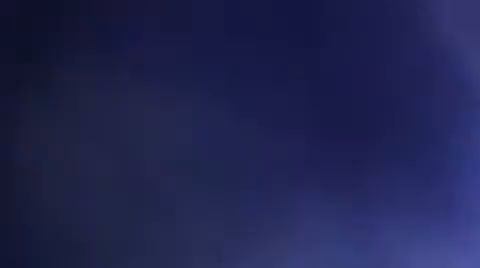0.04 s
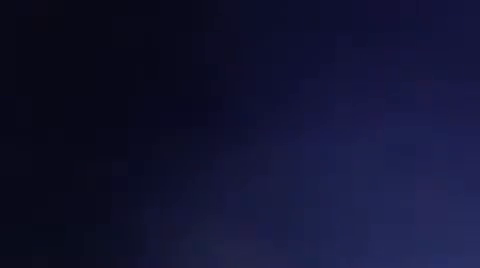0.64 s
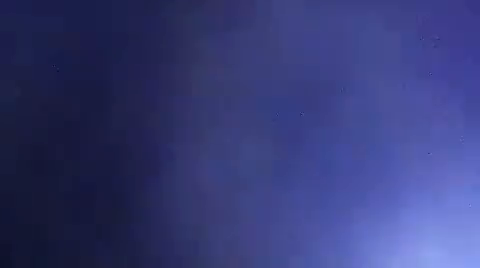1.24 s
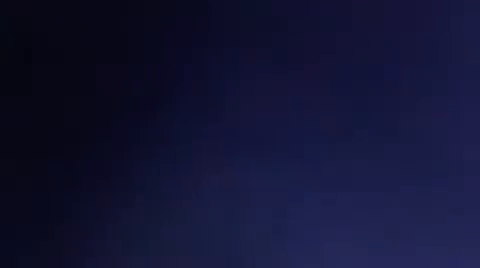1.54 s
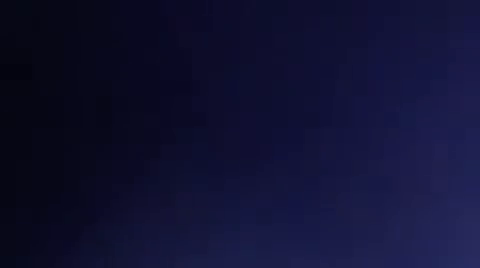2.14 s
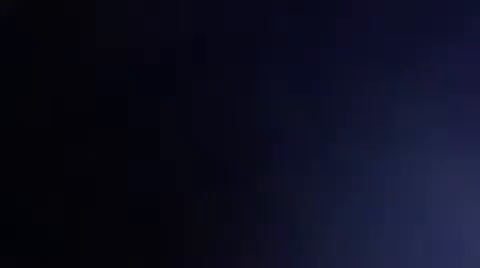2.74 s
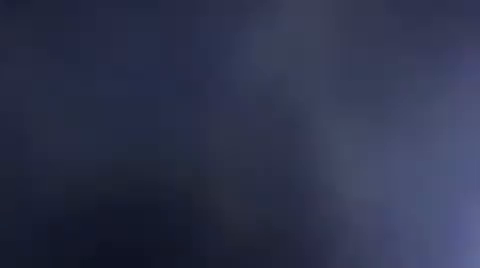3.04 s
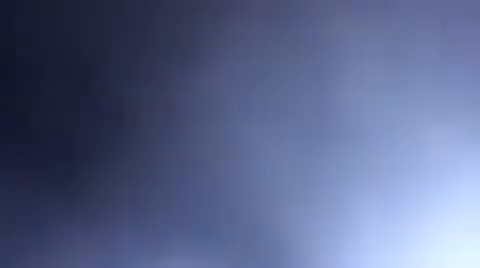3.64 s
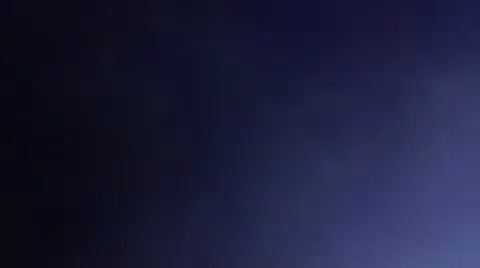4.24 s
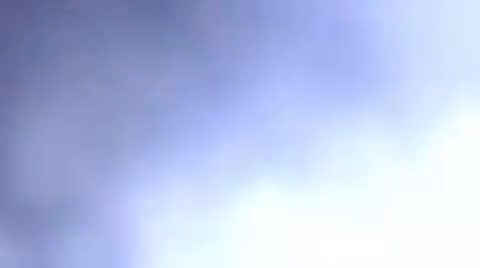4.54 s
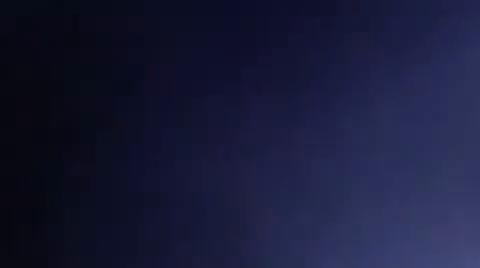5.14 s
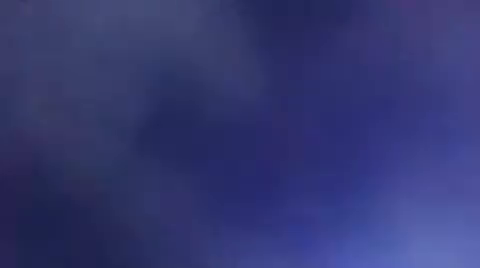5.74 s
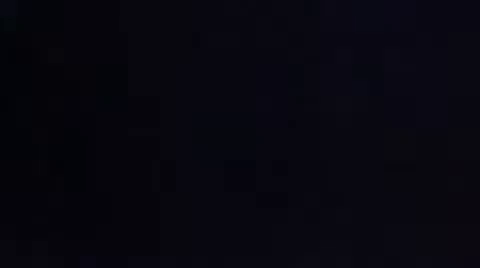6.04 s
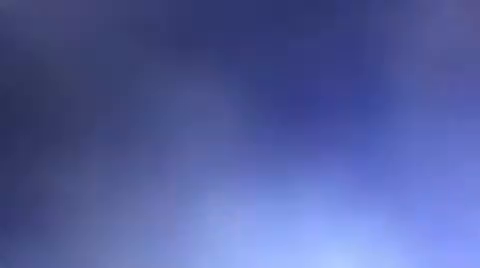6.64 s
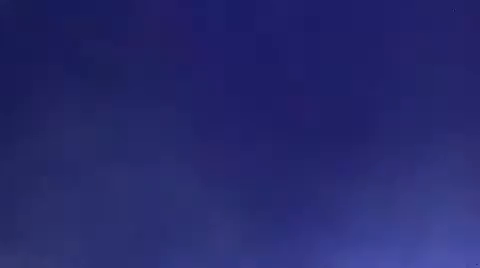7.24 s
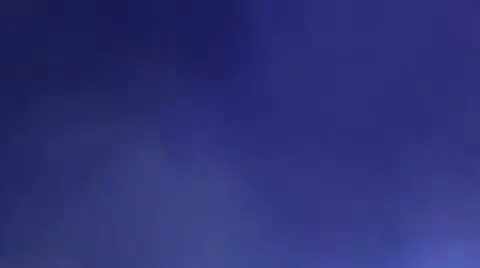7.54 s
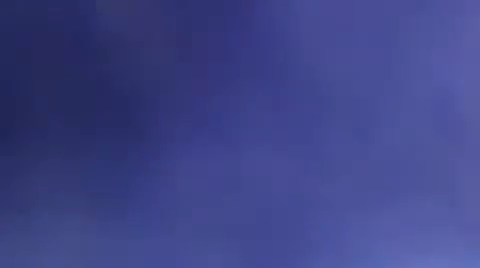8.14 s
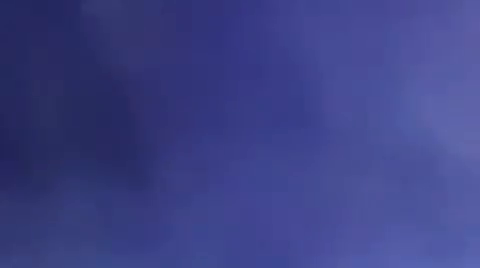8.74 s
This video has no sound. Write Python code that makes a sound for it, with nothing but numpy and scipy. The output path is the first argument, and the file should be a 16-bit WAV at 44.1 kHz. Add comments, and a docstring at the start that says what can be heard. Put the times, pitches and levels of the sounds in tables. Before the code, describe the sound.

Close, muffled fabric rustles and rumbles against a pocketed microphone, broken by dull bumps and short scuffs.

```python
"""Soft cloth slides in uneven strokes over the port of a microphone carried in a pocket.
Stick-slip friction makes the weave rasp, loose fibres hiss and the pressed cloth rumble on the case.
Now and then the case bumps the body and trapped air rings with a dull thump. There are short ticks
and scuffs of cloth, one squeak, and one sharp crack as the hardest thump overloads the microphone.
Far sounds come faintly through the fabric."""
import sys
import numpy as np
from scipy import signal
from scipy.fft import rfft, irfft, next_fast_len
from scipy.io import wavfile

SR = 44100
rng = np.random.default_rng(int(sys.argv[2]) if len(sys.argv) > 2 else 0)


def bounce(signal):
    """Save signal as a 16-bit WAV file at the path given by the first command-line argument."""
    frames = np.transpose(np.atleast_2d(signal))
    limited = np.clip(frames, -1, 1)
    pcm = np.round(limited * 32767).astype(np.int16)
    wavfile.write(sys.argv[1], SR, pcm)


N = 396459

# Strokes of the cloth. Each row: peak time, rise and fall in seconds, rasp level in dB,
# then rumble and hiss in dB over the rasp. The levels stand before each layer's trim.
RUBS = [(.02,0.041,0.042,-46.5,13,-5.5),(.105,0.037,.05,-41.5,13,-8.5),(.185,0.029,0.033,-46,14.5,-7),(.32,0.14,0.082,-51,8,-4),(.45,0.055,0.04,-51,16,-2),(.55,0.076,.04,-50.5,12,-2.5),(.66,0.019,0.037,-54.5,7,-9),
        (1.016,0.041,0.052,-38.5,9,-7.5),(1.13,0.03,0.034,-45.5,8,-7.5),(1.29,0.093,.06,-49,6.5,-3),(1.39,.05,0.035,-45.5,9.5,-5.5),(1.51,.025,0.049,-60,-6,3.5),(1.555,0.0096,0.092,-50,10.5,-5),
        (1.694,0.032,0.08,-32.5,8.5,-11),(1.77,0.024,.03,-46,18.5,-18),(1.89,0.072,.07,-49,13,-6),(2.01,0.13,0.045,-43,11.5,-8.5),(2.287,0.018,0.025,-30.5,9,-12),(2.384,0.052,0.05,-34.5,10,-12.5),
        (2.575,0.023,0.056,-46,12.5,-16),(2.634,0.053,0.05,-42.5,7,-4.5),(2.82,0.084,0.1,-62,-13,5),(2.877,0.0076,0.03,-33.5,9.5,-9),(2.979,0.031,0.039,-32,10,-12.5),(3.25,0.097,0.053,-46,10.5,-8),
        (3.32,0.043,0.05,-57,-7,5.5),(3.55,0.066,0.064,-43,-11,-4),(3.629,0.063,0.023,-38,9.5,-10.5),(3.719,0.024,0.046,-46,12.5,-14),(3.85,0.092,0.083,-53,18.5,-36),(3.955,0.082,0.063,-44.5,9,-6),(4.005,0.035,0.019,-33,8.5,-10),(4.074,0.063,0.052,-40,9,-8.5),(4.15,0.035,0.036,-42,6.5,-18),
        (4.285,0.036,0.025,-48.5,8.5,-8),(4.32,0.022,0.026,-47,-8,-4.5),(4.38,0.033,0.14,-45.5,10.5,-8),(4.486,0.027,0.032,-31,3.5,-12.5),(4.73,0.16,0.27,-49.5,11,-10.5),(4.879,.01,0.029,-37,14,-8),(4.93,.02,0.033,-42.5,6.5,-8),(5.005,0.045,0.026,-41.5,4,-10.5),
        (5.148,0.06,0.056,-44,12.5,-12),(5.29,0.066,0.12,-48.5,17.5,-4.5),(5.371,0.024,0.04,-24.5,10,-12),(5.594,0.028,0.056,-47,14.5,-10.5),(5.836,0.074,0.048,-41,12,-9),
        (6.01,0.09,0.12,-44.5,7,-8.5),(6.11,0.061,0.027,-49.5,18,-11),(6.235,0.061,0.049,-46.5,18,-6),(6.296,.016,0.021,-19,7.5,-14.5),(6.351,0.033,.035,-43,9,-2),(6.519,0.019,0.031,-45,15,-13),
        (6.682,0.07,0.029,-42,12.5,-10),(6.745,0.021,.025,-39,10,-15),(6.825,0.057,0.036,-39,13,-7),(6.99,0.094,0.086,-44.5,8.5,-9.5),(7.16,.04,0.027,-55.5,8,-6),(7.241,0.023,0.027,-31.5,7.5,-12),(7.41,0.093,0.059,-43.5,11,-14.5),
        (7.525,0.021,0.038,-39.5,7,-13.5),(7.6,.02,0.028,-50,-2,-26),(7.7,0.09,0.18,-53,11,-14),(8.072,0.02,0.062,-39.5,9,-11),(8.136,.02,0.028,-43.5,14,-14),(8.189,0.039,0.052,-37,7,-13.5),(8.31,0.048,0.09,-45.5,14.5,-10.5),(8.446,0.03,0.032,-42.5,6,-10.5),(8.565,0.047,0.11,-47,10.5,-11.5),(8.679,0.035,0.059,-52.5,11.5,-12),(8.97,0.076,0.087,-48.5,3,-8)]


def cloth(stall_db=-53.5, full_grind_db=-26, catch_limit_db=-34):
    """Stick-slip friction: one sliding contact drives rumble, rasp and hiss, so they judder together."""
    # Spectra of the three layers. Each row: frequency in Hz, relative spectral level in dB.
    rumble_spectrum = [(20, -43), (45, -27), (80, -11.5), (125, -2), (190, 3.5), (250, 0), (310, -1.5),
                       (375, -6), (450, -10), (620, -11.5), (850, -19), (1500, -75)]
    rasp_spectrum = [(100, -23), (300, 0.5), (530, 0.5), (700, 1), (860, -4.5), (1150, -2.5), (1700, -4.5),
                     (2600, -8.5), (3800, -13.5), (5500, -21.5), (10000, -59.5)]
    hiss_spectrum = [(1500, -6.5), (3000, 3), (4500, 3), (5500, 1.5), (6500, 0.5), (8000, -3.5), (9400, -8),
                     (10300, -30.5)]
    # Slow creep between the strokes. Each row: time in seconds, rasp level in dB.
    creep = [(0,-51.5),(.7,-52.5),(.83,-59),(.93,-50.5),(1.5,-51.5),(2.15,-52),(2.23,-52.5),(2.45,-47),(4.1,-55.5),(4.22,-58),(4.4,-58),(5.5,-51),(5.7,-55.5),(7.15,-57.5),(7.72,-54.5),(7.87,-65),(8.0,-51.5),(8.5,-60),(8.8,-57)]
    rasp_db, rumble_db, hiss_db = np.transpose(RUBS)[3:]
    judder = flutter(per_s=92)
    grip = slips(per_s=5000, spread_db=3.5)
    weave = slips(per_s=9000, spread_db=-2.5)
    fibres = slips(per_s=22000, spread_db=0.5)
    creep_db = np.interp(np.arange(N) / SR, *np.transpose(creep)) - 1.6 * flutter(per_s=18)
    effort = rubbing(rasp_db + 2.5, creep_db)
    rumble_gain = rubbing(rasp_db + rumble_db + 2.9, creep_db + 2.5)
    hiss_gain = rubbing(rasp_db + hiss_db + 3.23, creep_db - 8.5, exponent=0.91)
    rumble = folds(coloured(grip, rumble_spectrum)) * rumble_gain * from_db(0.53 * judder)
    rasp = coloured(weave, rasp_spectrum) * effort * from_db(0.4 * judder)
    # As the cloth stalls, the fibres stop slipping: the rasp dulls and the hiss dies.
    slipping = 1 / (1 + (from_db(stall_db) / effort) ** 4)
    dull_rasp = signal.sosfilt(signal.butter(1, 2800, fs=SR, output="sos"), rasp)
    rasp = slipping * rasp + (1 - slipping) * dull_rasp
    hiss = coloured(fibres, hiss_spectrum) * hiss_gain * slipping * from_db(0.6 * judder)
    # Pressed hard, the weave grinds with a fuller middle.
    pressed = np.minimum(effort / from_db(full_grind_db), 1)
    grind = from_db(-3) * pressed * resonance(rasp, hz=800, width_hz=1100)
    # A thread holds only so much force, which limits the level of its tick.
    ticks = np.minimum(effort, from_db(catch_limit_db)) * catches()
    return rumble + rasp + grind + hiss + ticks


def slips(per_s, spread_db):
    """Shot noise: threads catch and let go at random, in a dense train of tiny uneven impulses."""
    released = rng.random(N) < per_s / SR
    return released * rng.standard_normal(N) * from_db(spread_db * flutter(per_s=3000))


def rubbing(levels_db, creep_db, exponent=1):
    """Incoherent sources add in power: the strokes and the creep give the gain of one layer."""
    power = sum(from_db(db) ** 2 * swell(*rub[:3]) ** exponent for rub, db in zip(RUBS, levels_db))
    power = np.interp(np.linspace(0, 1, N), np.linspace(0, 1, len(power)), power)
    return np.sqrt(power + from_db(creep_db) ** 2)


def swell(peak_s, rise_s, fall_s, settle_db=-22.5, settle_s=0.081):
    """Friction power follows sliding speed: one stroke gathers pace, peaks, slows and settles."""
    t = np.arange(0, N, 32) / SR - peak_s
    span_s = np.where(t < 0, rise_s, fall_s)
    shape = np.where(t < 0, 1.35, 1.11)   # 1 is pointed, 2 is a bell
    slide = np.exp(-2 * np.abs(t / span_s) ** shape)
    settling = (t > 0) * from_db(settle_db) ** 2 * np.exp(-2 * np.abs(t) / settle_s)
    return slide + settling


def folds(x, shifting_db=7.0):
    """Cavity resonance: as folds open and close, now one hollow booms and now another; rms 1."""
    # Air trapped in the folds. Each row: frequency in Hz, bandwidth in Hz, median gain in dB.
    cavities = [(162.6, 19, -8.5), (226.7, 28.5, -1), (275.6, 66, -11), (377, 180, 2.5)]
    booms = [from_db(db + shifting_db * flutter(per_s=12)) * resonance(x, hz, width_hz)
             for hz, width_hz, db in cavities]
    return rms_one(x + sum(booms))


def catches(per_s=12, hz=900, width_hz=1200, over_rasp_db=9):
    """Impulse response: single threads let go at random, each with a small, heavily damped tick."""
    clicks = (rng.random(N) < per_s / SR) * rng.uniform(.3, 1, N)
    ticks = resonance(resonance(clicks, hz, width_hz), hz, 2 * width_hz)
    return from_db(over_rasp_db) * ticks / (np.abs(ticks).max() + 1e-12)


def thumps(contact_cycles=0.14, leak_hz=170, cloth_ratio=0.64, q=0.93, lead_s=0.0015):
    """Damped oscillation: a padded push compresses the air at the port, which swings for a few cycles."""
    # Bumps of the case against the body. Each row: time in seconds, peak level in dB, pitch in Hz.
    bumps = [(1.132,-33,230),(1.685,-15,173),(2.265,1.5,207),(2.271,1.5,213),(2.276,-14,71),(2.28,-2,204),(2.869,-11,201),(2.877,-5.5,115),(2.953,-3,204),(3.573,-8,163),(3.704,-14,134),
             (3.956,-19,150),(4.442,-3,164),(4.467,-13,165),(4.507,-15,210),(4.612,-24,146),(4.667,-4,172),(4.871,1.5,197),(5.114,-21,185),(5.138,-12,170),(5.181,-20,260),(5.262,-18,191),(5.343,-11,246),
             (5.57,-8,166),(5.604,-18,130),(5.616,-12.5,129),(5.773,.5,184),(5.805,-22,140),(6.072,-27.5,115),(6.187,-19.5,187),(6.2,-12,183),(6.228,-12,207),(6.254,-12.5,187),(6.342,-22,196),(6.361,-21,209),(6.487,-23,150),(6.514,-12.5,125),(6.535,-12,142),(6.586,-25.5,135),(7.211,-15.5,180),(7.226,-10.5,156),(7.69,-23.5,328),(8.412,-22.5,200)]
    out, t = np.zeros(N), np.arange(SR // 20) / SR - lead_s
    leak = signal.butter(2, leak_hz, "high", fs=SR, output="sos")
    for s, peak_db, hz in bumps:
        push = np.exp(-.5 * (t * hz / contact_cycles) ** 2)
        squeeze = signal.sosfilt(leak, push)   # slow pressure leaks through the weave
        air = resonance(squeeze, hz, hz / q)
        cloth_hz = cloth_ratio * hz   # the cloth follows the air at a lower pitch
        add(out, s - lead_s, peak_db, resonance(air, cloth_hz, cloth_hz / q))
    return out


def ticks_and_crack(cutoff_ratio=1.68):
    """Transient excitation: a decaying noise burst drives a broad resonance, as a tick, scuff or crack."""
    # Short ticks and scuffs of cloth, and at 2.269 s one sharp crack as the hardest thump overloads
    # the microphone. Each row: start in seconds, peak level in dB, pitch in Hz, decay time in seconds.
    transients = [(.653,-37.5,330,.011),(.947,-32,296,0.016),(1.547,-32,500,.006),(1.636,-26.5,1700,0.0018),(2.189,-26.5,1100,0.0014),(2.269,-10,900,0.0014),(2.279,-10,525,0.0054),(2.372,-18.5,480,0.027),(2.653,-23,990,0.0011),(2.873,-29,6000,0.0075),(2.877,-25,2000,.003),(3.592,-27,700,0.0033),(3.700,-33,600,.004),
                  (4.277,-29,750,0.002),(4.440,-24.5,650,.0027),(4.463,-20,800,0.0028),(4.645,-28.5,1110,0.0016),(4.871,-31,594,0.0092),(5.163,-21.5,1900,0.00067),(5.361,-12.5,844,0.017),(5.564,-32,700,0.0054),(5.683,-39,4480,0.0081),
                  (5.768,-25,600,.004),(6.513,-29,800,0.0024),(6.874,-34,3000,.002),(6.884,-37,3000,.0013),(7.221,-24,5500,0.0074),(7.600,-29,417,0.0046),(7.619,-33,800,0.0022),(8.127,-27.5,800,0.0023),(8.907,-38,900,0.0018)]
    out, t = np.zeros(N), np.arange(SR // 15) / SR
    for s, peak_db, hz, decay_s in transients:
        burst = rng.standard_normal(len(t)) * np.exp(-t / decay_s)
        ring = signal.lfilter(*signal.iirpeak(hz, Q=1, fs=SR), burst)
        lowpass = signal.butter(2, min(cutoff_ratio * hz, SR / 6), fs=SR)
        add(out, s, peak_db, signal.lfilter(*lowpass, ring))
    return out


def squeak(hz=590, width_hz=110, decay_s=0.014):
    """Narrow-band resonance: cloth sticks and slips on the case for a moment and rings at one pitch."""
    out, t = np.zeros(N), np.arange(SR // 10) / SR
    burst = rng.standard_normal(len(t)) * np.exp(-t / decay_s)
    ring = resonance(resonance(burst, hz, width_hz), hz, hz / 2)
    add(out, s=1.448, peak_db=-29, sound=ring)
    return out


def pocket(x, reflection=0.13, delay_s=.003, sway=0.263):
    """Comb filtering: the pocket's moving walls return a short echo whose path length drifts."""
    now = np.arange(N)
    lag = delay_s * SR * np.exp(sway * flutter(per_s=1.0))
    return x + reflection * np.interp(now - lag, now, x)


def case(x):
    """Modal colouring: the case and its port put slight peaks and dips in the spectrum."""
    # Resonances of case and port. Each row: frequency in Hz, bandwidth in Hz, gain in dB.
    modes = [(562, 37, 0.5), (1110, 23, 0.5), (1550, 24, -0.5), (1900, 23, 1), (2770, 41, 1),
             (9490, 78, -4.5)]
    return x + sum((from_db(db) - 1) * resonance(x, hz, width_hz) for hz, width_hz, db in modes)


def ambience(level_db=-65.5):
    """Transmission loss: far sounds pass through the cloth as a steady, muffled noise."""
    # Background inside the pocket. Each row: frequency in Hz, relative spectral level in dB.
    spectrum = [(20, -50), (50, -27.5), (100, -3), (300, 7), (600, -13.5), (1200, -3), (3000, -21.5),
                (5500, -45.5), (10000, -55)]
    return from_db(level_db) * coloured(rng.standard_normal(N), spectrum)


def coloured(x, spectrum):
    """Source-filter shaping: an excitation is multiplied by a spectral envelope; rms 1."""
    size = next_fast_len(N)
    hz, db = np.transpose(spectrum)
    bin_hz = np.maximum(np.arange(size // 2 + 1) * SR / size, 1)
    gain = from_db(np.interp(np.log(bin_hz), np.log(hz), db))
    return rms_one(irfft(rfft(x, size) * gain, size)[:N])


def resonance(x, hz, width_hz):
    """A damped oscillator: two poles, with unit gain at the peak."""
    radius = np.exp(-np.pi * width_hz / SR)
    feedforward = np.array([1, 0, -1]) * (1 - radius ** 2) / 2
    feedback = [1, -2 * radius * np.cos(2 * np.pi * hz / SR), radius ** 2]
    return signal.lfilter(feedforward, feedback, x + 1e-18)


def flutter(per_s):
    """Random modulation: a line through per_s Gaussian values a second; rms 1."""
    values = rng.standard_normal(N // 10)
    return rms_one(np.interp(np.arange(N) * per_s / SR, np.arange(len(values)), values))


def add(out, s, peak_db, sound):
    """Superposition: a short sound joins the mix at its time and peak level."""
    start = round(s * SR)
    out[start:start + len(sound)] += (from_db(peak_db) * sound / np.abs(sound).max())[:N - start]


def from_db(db):
    """Decibels as an amplitude ratio."""
    return 10 ** (np.asarray(db) / 20)


def rms_one(x):
    """Normalisation to rms 1."""
    return x / np.sqrt(np.mean(x ** 2) + 1e-20)


def scene():
    """Superposition: cloth sounds and the crack, coloured by the case, add to thumps and background."""
    background = ambience()
    close_sounds = pocket(cloth()) + ticks_and_crack() + squeak()
    return (case(close_sounds) + thumps() + background)[None]


def record(dry, cutoff_hz=10200):
    """Clipping and band limiting: the hardest thumps overload the input; a low-pass cuts the top."""
    lowpass = signal.ellip(12, .2, 100, cutoff_hz, fs=SR, output="sos")
    return signal.sosfilt(lowpass, np.clip(dry, -1, 1))


dry = scene()
out = record(dry)
bounce(out)
```